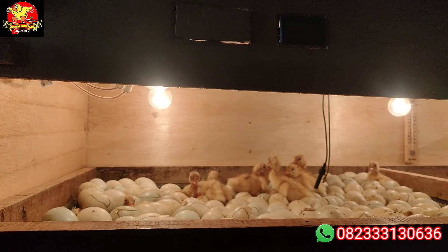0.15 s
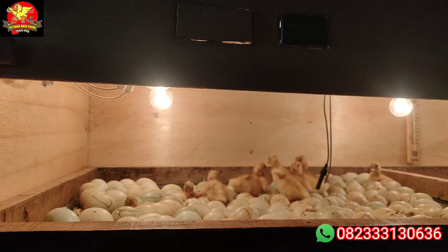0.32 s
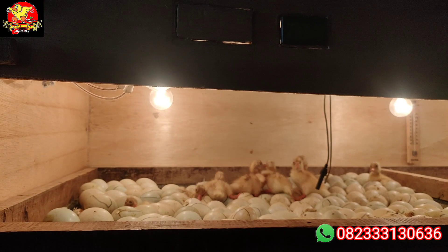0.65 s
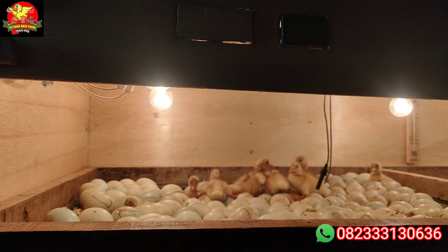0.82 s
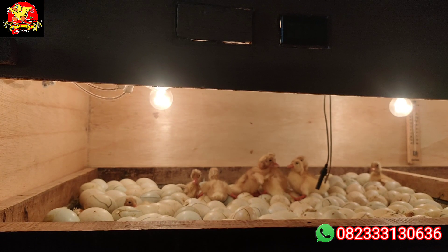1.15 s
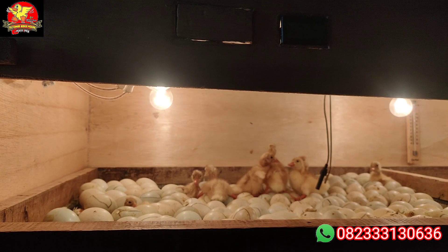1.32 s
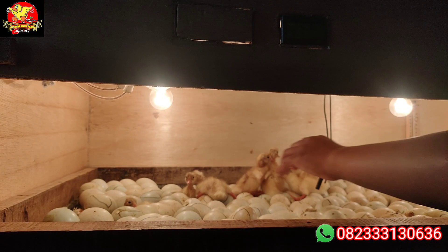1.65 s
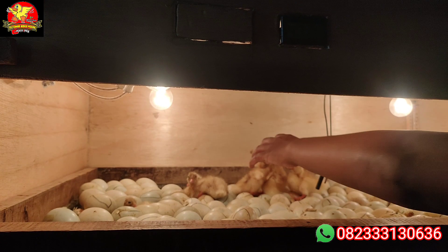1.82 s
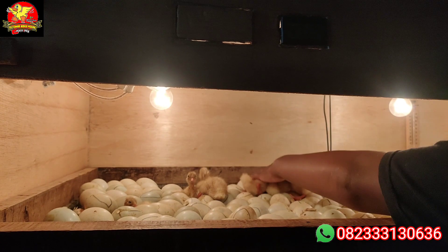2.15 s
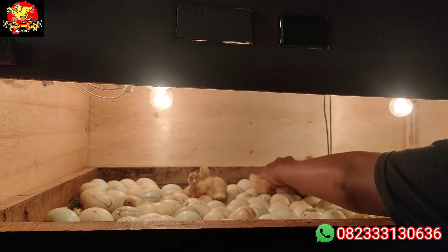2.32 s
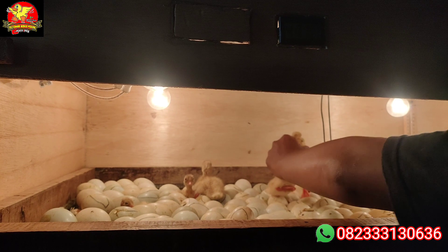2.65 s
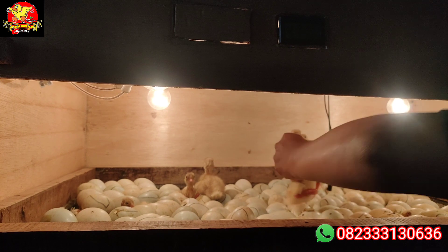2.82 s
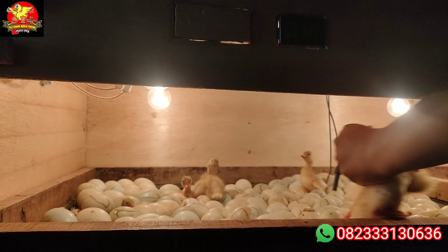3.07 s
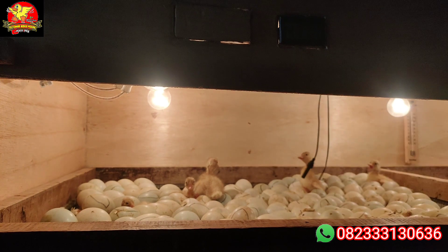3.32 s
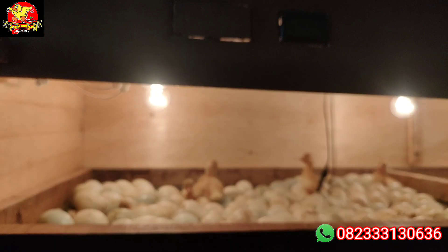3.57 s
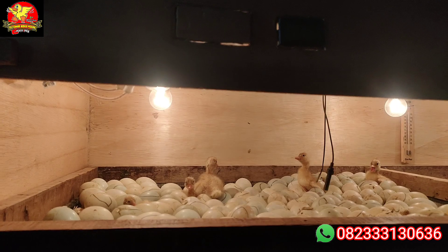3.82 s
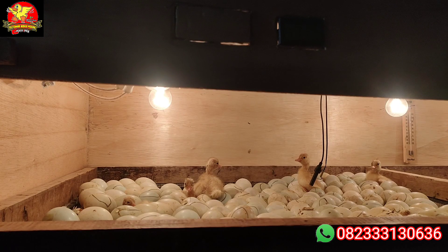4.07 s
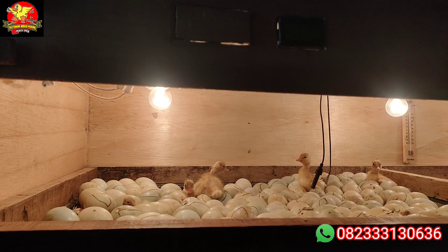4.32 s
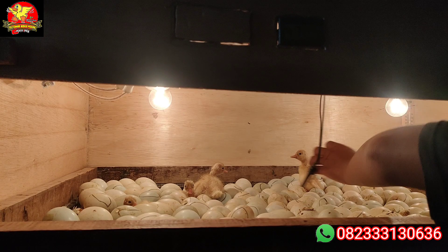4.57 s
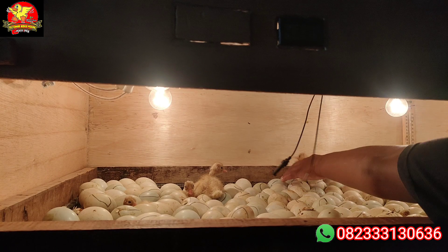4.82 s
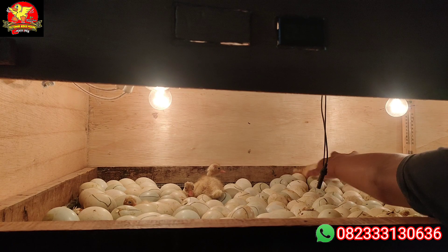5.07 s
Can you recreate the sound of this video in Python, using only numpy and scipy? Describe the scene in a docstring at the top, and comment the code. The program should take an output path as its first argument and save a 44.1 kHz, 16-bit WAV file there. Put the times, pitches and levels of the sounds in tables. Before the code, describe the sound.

A very quiet room with a faint low rumble, heard closely in stereo inside a plywood incubator. From 0 to 0.9 s ducklings give clusters of brief, soft, arched whistles around 3 kHz, over crisp eggshell scuffs and a light bump. A thin, high chirp repeats faintly throughout. Cloth swells from about 1.0 s into a loud hissing brush near 1.15 s, gone by 1.4 s, with a small click at 1.3 s. Faint sleeve slides follow around 1.7, 2.0 and 2.4 s, with soft tray bumps. From 2.7 to 4.2 s a lifted duckling cries five times, at about 2.7, 3.1, 3.4, 3.7 and 4.0 s: held, rising notes that break into a rough shrill top and plunge, the last weaker and hoarser. Faint hollow rubs lie underneath. At 4.4 to 4.7 s the tray thuds and rings dully with woody scrapes; lighter scuffs and sparse peeps finish.

```python
"""Inside a plywood incubator in a very quiet room: newly hatched ducklings peep close to a two-port microphone.
One is picked up and cries out five times; each bird is an almost pure whistle with weak overtones.
A big brush of cloth and three slides of a sleeve are shaped friction noise, as are feet scuffing eggshells.
The bumped tray thuds and rings in its modes, something hollow is rubbed nearby, a thin high chirp repeats
faintly. Reflections from the box and the room behind it smear every source."""
import sys
import numpy as np
from scipy import signal
from scipy.fft import rfft, irfft
from scipy.io import wavfile
from scipy.ndimage import uniform_filter1d

SR = 44100
rng = np.random.default_rng(int(sys.argv[2]) if len(sys.argv) > 2 else 0)


def master(y):
    """Save y as 16-bit WAV."""
    cut = np.clip(np.atleast_2d(y).T, -1, 1)
    pcm = np.round(cut * 32767)  # scale
    wavfile.write(sys.argv[1], SR, pcm.astype(np.int16))


N = 229143  # length in samples

# Levels in the tables are those at the source, ahead of the box, the room and the mix.
# Spectrum of the quiet room. Each row: frequency in Hz, density in dB per Hz.
AIR_SPECTRUM = [(25, -15.5), (60, -2.5), (110, -18), (300, -21), (1000, -23.5), (3000, -20), (6500, -20.5),
                (10000, -21), (15500, -25.5)]
# Thin chirps. Each entry: start in seconds.
CHIRP_STARTS = [.07, 0.319, .585, .72, .84, 1.519, 1.66, 2.215, 2.354, 2.49, 2.63, 2.89, 3.035, 3.696, 4.35,
                4.755, 5.02, 5.154]
# Soft arched peeps. Each row: start in seconds, length in seconds, top pitch in Hz, place of the top [0-1],
# share of the pitch lost at the end farther from the top [0-1], level in dB.
PEEP_CALLS = [(0.222, 0.058, 3216, 0.54, 0.3, -66.5), (0.312, 0.044, 3320, 0.47, .14, -58.5),
              (0.358, .035, 3050, 0.6, .25, -57.5), (0.395, 0.033, 3420, 0.67, .15, -60),
              (0.511, .045, 2900, .05, 0.29, -57), (0.526, 0.056, 3175, 0.56, 0.35, -59),
              (0.544, .057, 3560, 0.4, 0.44, -64), (.618, 0.069, 3480, 0.45, 0.44, -62.5),
              (0.621, 0.046, 3316, 0.42, .4, -59.5), (0.676, 0.095, 3650, 0.06, .26, -66.5),
              (0.748, 0.037, 2738, 0.67, 0.16, -62.5), (0.825, .053, 3257, 0.4, .15, -67),
              (.864, .038, 2544, 0.45, 0.17, -51.5), (0.882, 0.06, 3370, 0.45, .27, -62),
              (0.919, 0.057, 3334, 0.6, 0.28, -57.5), (1.384, 0.034, 4620, 0.58, 0.15, -58),
              (1.408, 0.076, 3900, 0.02, 0.27, -62), (1.619, 0.052, 3460, .45, 0.25, -72.5),
              (1.674, 0.027, 3365, 0.66, 0.13, -57.5), (1.766, 0.03, 4610, .05, 0.5, -58),
              (2.326, 0.044, 3400, 0.25, .18, -72), (2.349, 0.064, 3190, .6, 0.18, -64),
              (2.522, 0.044, 4893, 0.94, 0.17, -55), (2.732, 0.066, 3490, 0.75, 0.08, -61),
              (2.834, 0.022, 4620, 0.02, 0.55, -50.5), (2.901, 0.057, 3830, .6, 0.25, -60.5),
              (2.93, 0.056, 3376, 0.49, .16, -59), (2.949, 0.038, 4177, 0.7, 0.15, -55.5),
              (3.068, .08, 3080, .35, .2, -69), (3.233, 0.056, 3560, .45, 0.37, -61.5),
              (3.457, 0.042, 3430, 0.7, 0.31, -64), (3.56, 0.15, 4250, 0.26, 0.53, -64),
              (3.771, 0.057, 4700, .35, 0.41, -57.5), (3.925, 0.072, 4340, 0.84, 0.39, -61),
              (4, 0.056, 4710, 0.28, .36, -67), (4.025, 0.05, 3570, 0.83, 0.37, -57.5),
              (4.156, 0.064, 3980, .45, 0.2, -67), (4.317, .11, 4630, .52, .37, -62.5),
              (4.414, 0.035, 3290, 0.95, 0.21, -56.5), (4.792, 0.09, 4600, 0.94, 0.47, -63),
              (4.854, 0.091, 3840, 0.89, 0.2, -50.5), (4.926, 0.024, 4270, 0.9, 0.046, -61.5),
              (5.116, 0.052, 3057, 0.76, 0.22, -58.5)]
# Faint hollow rubs. Each row: start in seconds, resonance in Hz, level in dB.
HOLLOW_RUBS = [(2.66, 996, -73.5), (2.84, 730, -70), (3.25, 310, -75.5), (3.309, 1190, -71),
               (3.42, 1030, -68), (3.541, 996, -67), (3.665, 585, -71), (3.868, 963, -65.5),
               (3.99, 1240, -67.5)]
# Bumps of the tray. Each row: start in seconds, level in dB, length of the push in seconds, upper edge in Hz.
TRAY_BUMPS = [(.04, -56.5, 0.035, 500), (2.088, -61.5, 0.026, 189), (2.226, -53, 0.018, 320),
              (2.439, -54, 0.022, 646), (2.807, -55, 0.056, 477), (4.438, -60, 0.025, 70),
              (4.497, -48.5, 0.044, 162), (4.565, -39, 0.063, 148), (4.819, -58, 0.027, 420),
              (5.049, -63, 0.02, 406)]
# Modes of the tray. Each row: frequency in Hz, level in dB, time to fall by 60 dB in seconds.
TRAY_MODES = [(104.2, -10, 0.2), (130, -2, 0.34), (155, -2, 0.32), (230.3, -5, 0.29), (331.3, -2, 0.12),
              (426, -8, 0.036), (688, -11.5, 0.054)]
# Dull thud under a bump. Each row: frequency in Hz, density in dB per Hz.
THUD_SPECTRUM = [(30, -20), (70, -8.5), (140, -5), (300, -5.5), (500, -12), (900, -12.5)]
# Scuffs on shells and wood. Each row: start in seconds, rise in seconds, decay in seconds, woody level in dB,
# resonance in Hz, crisp level in dB.
SHELL_SCUFFS = [(0, 0.001, 0.1, -58, 487, -51), (.05, 0.0024, 0.0048, -46, 1430, -44.5),
                (0.125, 0.017, 0.027, -50.5, 814, -42.5), (0.361, 0.0063, 0.021, -50, 586, -43),
                (0.365, 0.075, 0.046, -50.5, 826, -58.5), (.56, 0.092, 0.073, -90, 1500, -72),
                (0.722, 0.0021, 0.0027, -82.5, 2000, -56), (1.316, 0.0024, 0.0036, -78, 3060, -42),
                (2.048, 0.015, 0.042, -67, 1600, -51.5), (2.809, 0.0094, 0.023, -58, 1560, -56.5),
                (4.436, .003, .02, -48, 820, -49.5), (4.488, 0.0055, 0.032, -52.5, 1820, -62),
                (4.538, 0.023, 0.021, -35.5, 1200, -50), (4.579, 0.013, 0.018, -39, 980, -45.5),
                (4.665, 0.006, 0.059, -60.5, 660, -58.5), (4.807, 0.017, 0.043, -59.5, 626, -55.5),
                (5.02, 0.005, 0.14, -60.5, 497, -69), (5.048, 0.018, .1, -52.5, 1380, -76)]
# Wood under the scuffs, then shell grit on top. Each row: frequency in Hz, density in dB per Hz.
WOOD_SPECTRUM = [(170, -10), (330, 1.5), (520, -3.5), (800, -3), (1300, -1), (1800, -2), (2400, -6),
                 (3100, -6), (4000, -15)]
GRIT_SPECTRUM = [(880, -89), (1500, -6), (3030, -6), (4140, -17.5), (4270, -15), (4890, -8), (6500, -7.5),
                 (8970, -9), (10800, -23), (15500, -17.5)]
# The big brush of cloth, one row: start in seconds, attack in seconds, hold in seconds, level in dB,
# release in dB per second.
CLOTH_BRUSH = (0.973, 0.1555, 0.0534, -37, 169)
# Strokes of the sleeve sliding in. Each row: start in seconds, attack in seconds, hold in seconds, level in dB.
SLEEVE_STROKES = [(1.647, 0.18, 0.094, -60.5), (1.979, 0.066, 0.013, -60.5), (2.309, 0.14, .01, -63)]
# Fibres of the brush, the panel under it, fibres of the sleeve. Each row: frequency in Hz, density in dB per Hz.
BRUSH_SPECTRUM = [(820, -9.5), (1400, -8), (1470, -18), (1640, -19), (1950, -2), (2050, -1.5), (3130, 1.5),
                  (3600, -10.5), (7070, -1.5), (10700, -11.5), (15500, -17.5)]
PANEL_SPECTRUM = [(150, -23.5), (240, -7), (350, -6), (520, -9), (630, -3), (900, -4.5), (1400, -3.5),
                  (2000, 3.5), (2600, -23.5)]
SLEEVE_SPECTRUM = [(410, -66), (700, -28.5), (828, -17.5), (993, -28), (1120, -24), (1410, -10.5),
                   (2560, 1), (4240, -8.5), (8540, -2), (11100, -15), (15500, -11)]
# Distress cries. Each row: start in seconds, time of the break in seconds, start pitch in Hz, held pitch in Hz,
# top pitch in Hz, fall length in seconds, held level in dB, top level in dB, rasp relative to the top in dB.
DISTRESS_CRIES = [(2.722, 2.796, 4163, 4820, 6270, 0.038, -40, -42, -3),
                  (3.126, 3.173, 4360, 4730, 6880, 0.06, -36, -41.5, -15),
                  (3.445, 3.495, 4380, 4583, 6570, 0.045, -38, -35.5, -13.5),
                  (3.735, 3.822, 4375, 4567, 6240, .052, -46.5, -36, -11),
                  (4.042, 4.068, 4900, 5550, 6270, 0.1, -49.5, -54, 10)]
# Hoarseness of a cry. Each row: frequency in Hz, density in dB per Hz.
RASP_SPECTRUM = [(1500, -17.5), (2800, -7), (4300, -11.5), (6200, 0.5), (7300, -7), (9000, -12),
                 (12000, -33.5), (15000, -13.5)]

# The rest of the brood, far fainter; pitches scatter a quarter octave either side of the middle one.
MURMUR_PER_S, MURMUR_MIDDLE_HZ, MURMUR_S, MURMUR_DB = 7, 2880, .07, -76.5
PEEP_ARCH = 2.0  # power of the arch's curve
RUB_S = 0.088
# The panel joins in later than the cloth, weaker, and stops sooner.
PANEL_LAG_S, PANEL_DB, PANEL_RELEASE_DB_PER_S = 0.034, -8.5, 233
SLEEVE_RELEASE_DB_PER_S = 124
CATCH_PER_S, CATCH_DB = 40, 0.7  # the cloth catches and slips as it goes
TOP_HZ = 15600  # upper edge of the microphone channel


def undb(db):
    """Decibels to gain."""
    return 10 ** (np.asarray(db) / 20)


def unit(x):
    """Scale to rms 1."""
    return x / np.sqrt(np.mean(x ** 2))


def add(track, s, x):
    """Mix x into the track from time s."""
    i = max(int(s * SR), 0)
    track[i:i + len(x)] += x[:max(N - i, 0)]


def colour(x, points):
    """Shape x by (Hz, dB) points, with gentle skirts beyond the first and last; rms 1."""
    hz, db = np.transpose(points)
    f = np.maximum(np.fft.rfftfreq(len(x), 1 / SR), 1)
    skirt = 1 / np.hypot(1, (hz[0] / f) ** 2) / np.hypot(1, (f / hz[-1]) ** 2)
    gain = undb(np.interp(np.log(f), np.log(hz), db))
    return unit(irfft(rfft(x) * skirt * gain, len(x)))


def walk(rate, size):
    """Random values, rate of them per second, joined by straight lines; spread near 1."""
    at = np.arange(size) * rate / SR
    count = int(at[-1]) + 2
    return np.interp(at, np.arange(count), rng.standard_normal(count))


def grains(spread_db):
    """Friction: countless tiny slips of very unequal size."""
    return rng.standard_normal(N) * undb(spread_db * walk(1500, size=N))


def whistle(hz, waver, second_db, third_db, flutter_db=2.0):
    """A syrinx: an almost pure tone with two weak overtones, unsteady in pitch and strength."""
    n = len(hz)
    phase = 2 * np.pi * np.cumsum(hz * (1 + waver * walk(500, size=n))) / SR
    second = undb(second_db + 4 * walk(120, size=n)) * np.sin(2 * phase)
    third = undb(third_db + 4 * walk(120, size=n)) * np.sin(3 * phase)
    third = third * (hz < SR / 7)  # keeps the third partial clear of aliasing
    flutter = undb(flutter_db * walk(150, size=n))
    return np.sqrt(2) * flutter * (np.sin(phase) + second + third)


def air(floor_db):
    """A very quiet room, mostly a low rumble shared by both ports."""
    mid, side = (colour(rng.standard_normal(N), AIR_SPECTRUM) for _ in range(2))
    return undb(floor_db) * (mid + 0.5 * side * np.array([[1], [-1]]))


def chirps(length=0.032, pitch_hz=6650, db=-66):
    """Thin, slightly hoarse chirps on one pitch, perhaps a cricket."""
    out = np.zeros(N)
    window = np.hanning(int(length * SR))
    pitch = np.full(len(window), pitch_hz)
    for s in CHIRP_STARTS:
        tone = whistle(pitch, waver=0.01, second_db=-72, third_db=-60)
        add(out, s, undb(db) * window * tone)
    return out


def rubs(width_hz=190):
    """Light rubbing wakes one hollow resonance at a time."""
    out, n = np.zeros(N), int(RUB_S * SR)
    ring_out = SR // 10
    contact = np.pad(signal.windows.tukey(n, .5), (0, ring_out))
    for s, hz, db in HOLLOW_RUBS:
        drive = rng.standard_normal(n + ring_out) * contact
        edges = [hz - width_hz / 2, hz + width_hz / 2]
        band = signal.butter(2, edges, "band", fs=SR, output="sos")
        ring = signal.sosfilt(band, drive)
        add(out, s, undb(db) * ring / np.std(ring[:n]))
    return out


def bumps(thud_db=-8, thud_decay=0.063):
    """A push thuds and builds up the tray's modes, which then ring out; softer contact keeps only the low ones."""
    out, t = np.zeros(N), np.arange(SR // 2) / SR
    for s, db, length, edge_hz in TRAY_BUMPS:
        after = np.maximum(t - length / 2, 0)  # time since the push peaked
        spectrum = [(hz, level - 10 * np.log10(1 + (hz / edge_hz) ** 4)) for hz, level in THUD_SPECTRUM]
        thud = colour(rng.standard_normal(len(t)), spectrum)
        ring = undb(thud_db) * thud * np.exp(-after / thud_decay)
        for hz, mode_db, t60 in TRAY_MODES:
            detuned_hz = hz * (1 + .006 * rng.standard_normal())
            phase = 2 * np.pi * (detuned_hz * t + rng.random())
            gain = undb(mode_db) / np.hypot(1, (hz / edge_hz) ** 2)
            ring = ring + gain * np.sin(phase) * np.exp(-np.log(1000) * after / t60)
        push = np.sin(np.pi * np.minimum(t / length, .5)) ** 2
        add(out, s, undb(db) * ring * push)
    return out


def scuffs(resonance_db=8):
    """Short uneven scrapes: shell grit on top, and below it wood that rings differently at every spot."""
    out, t = np.zeros(N), np.arange(int(.6 * SR)) / SR
    wood = colour(grains(spread_db=6.0), WOOD_SPECTRUM)
    grit = colour(grains(spread_db=5.5), GRIT_SPECTRUM)
    for s, rise, decay, woody_db, hz, crisp_db in SHELL_SCUFFS:
        stretch = (int(s * SR) + np.arange(len(t))) % N
        push = np.minimum(t / rise, 1) * np.exp(-np.maximum(t - rise, 0) / decay)
        push = push * undb(2 * walk(110, size=len(t)))
        ring = signal.lfilter(*signal.iirpeak(hz, 2.5, fs=SR), wood[stretch])
        woody = unit(wood[stretch] + undb(resonance_db) * unit(ring))
        add(out, s, push * (undb(woody_db) * woody + undb(crisp_db) * grit[stretch]))
    return out


def stroke(s, attack, hold, db, release_db_per_s):
    """Gain of one stroke: it eases in, holds a little unevenly and dies away."""
    t = np.arange(N) / SR - s
    release_db = release_db_per_s * np.maximum(t - attack - hold, 0)
    level_db = db - release_db + CATCH_DB * walk(CATCH_PER_S, size=N)
    return np.sin(np.pi / 2 * np.clip(t / attack, 0, 1)) ** 3 * undb(level_db)


def cloth():
    """Fabric drags over wood: fibres hiss, and under pressure the panel joins in."""
    s, attack, hold, db, _ = CLOTH_BRUSH
    hiss = stroke(*CLOTH_BRUSH) * colour(grains(spread_db=5.5), BRUSH_SPECTRUM)
    pressure = stroke(s + PANEL_LAG_S, attack, hold, db + PANEL_DB, PANEL_RELEASE_DB_PER_S)
    panel = pressure * colour(grains(spread_db=5.5), PANEL_SPECTRUM)
    slide = sum(stroke(*row, SLEEVE_RELEASE_DB_PER_S) for row in SLEEVE_STROKES)
    return hiss + panel + slide * colour(grains(spread_db=5.0), SLEEVE_SPECTRUM)


def peep(length, top_hz, place, sag, db):
    """Pitch arches up and down with the breath; the higher it is pushed, the stronger its overtones."""
    u = np.linspace(0, 1, int(length * SR))
    distance = np.abs(u - place) / max(place, 1 - place)  # from the top of the arch
    hz = top_hz * (1 - sag * distance ** PEEP_ARCH)
    strain_db = 30 * np.log2(np.minimum(hz, 4000) / 4000)
    pressure = np.abs(np.sin(np.pi * u)) ** .4
    tone = whistle(hz, waver=0.012, second_db=-13 + strain_db, third_db=-28.0 + strain_db)
    return undb(db) * pressure * tone


def peeps():
    """The near ducklings peep over a faint murmur of the others, scattered at random."""
    out = np.zeros(N)
    for s, *shape in PEEP_CALLS:
        add(out, s, peep(*shape))
    for when, pitch, place in rng.random((int(MURMUR_PER_S * N / SR), 3)):
        top_hz = MURMUR_MIDDLE_HZ * 2 ** ((pitch - .5) / 2)
        add(out, when * N / SR, peep(MURMUR_S, top_hz, place, sag=0.23, db=MURMUR_DB))
    return out


def cries(leap_s=0.01, top_s=0.022, end_hz=3000):
    """A held note swells, breaks upward into a shrill rough top and plunges."""
    out = np.zeros(N)
    for s, break_s, start_hz, held_hz, top_hz, fall, held_db, top_db, rasp_db in DISTRESS_CRIES:
        hold = break_s - s
        t = np.arange(int((hold + fall) * SR)) / SR
        knots = np.sort([0, hold * 0.217, hold, hold + leap_s, hold + top_s, hold + fall])
        hz = np.interp(t, knots, [start_hz, start_hz, held_hz, top_hz * .96, top_hz, end_hz])
        db = np.interp(t, knots, [held_db - 17.5, held_db - 9, held_db, top_db, top_db - 4.0, top_db - 19.5])
        shrill = np.clip((t - hold) / leap_s, 0, 1)  # 0 while held, 1 after the break
        tone = whistle(hz, waver=.005 + .07 * shrill, second_db=-26, third_db=-25, flutter_db=2.2)
        rasp = colour(rng.standard_normal(len(t)), RASP_SPECTRUM) * undb(4 * walk(400, size=len(t)))
        roughness = undb(-19.5) + shrill * undb(rasp_db)
        add(out, s, undb(db) * (tone + roughness * rasp))
    return out


def enclosure(x, direct, box_db, room_db, pan_db, lag_s, box_t60=0.077, room_t60=0.39):
    """Direct sound at two ports, quick reflections from the plywood walls, then the room's longer tail."""
    t = np.arange(SR // 2) / SR
    out = []
    for side in (1, -1):
        sparse = rng.standard_normal(len(t)) * (rng.random(len(t)) < .03)
        walls = sparse * (t > .002) * np.exp(-np.log(1000) * t / box_t60)
        tail = rng.standard_normal(len(t)) * (t > .012) * np.exp(-np.log(1000) * t / room_t60)
        echo = undb(box_db) * walls / np.linalg.norm(walls) + undb(room_db) * tail / np.linalg.norm(tail)
        near = np.roll(direct, int(lag_s * SR) * (side < 0))  # reaches the second port later
        out.append(undb(side * pan_db / 2) * (near + signal.fftconvolve(x, echo)[:N]))
    return np.array(out) / np.sqrt(1 + undb(2 * box_db) + undb(2 * room_db))


def suppress(x, threshold_db=-101, depth_db=-11):
    """Noise suppressor: every narrow band is turned down while it is weak."""
    _, _, bands = signal.stft(x, nperseg=1024)
    power = np.mean(np.abs(bands) ** 2, axis=0)  # both ports together
    power = uniform_filter1d(power, size=9, axis=0)  # smooth over frequency
    power = uniform_filter1d(power, size=3, axis=1)  # smooth over time
    opening = 1 / (1 + (undb(2 * threshold_db) / np.maximum(power, 1e-20)) ** 2)
    _, quiet = signal.istft(bands * undb(depth_db * (1 - opening)), nperseg=1024)
    return quiet[:, :N]


def scene():
    """Room air, handling and ducklings, each source with its own place in the box."""
    brood, cry = peeps() + chirps(), cries()
    scrape, brush, bump, rub = scuffs(), cloth(), bumps(), rubs()
    return (air(floor_db=-75.5)
            + enclosure(rub, rub, box_db=-7.5, room_db=-3.5, pan_db=2.0, lag_s=0.00031)
            + enclosure(bump, bump, box_db=-27, room_db=-14.0, pan_db=-0.5, lag_s=0.00021)
            + enclosure(scrape, scrape, box_db=2.5, room_db=-3.5, pan_db=1.5, lag_s=.0003)
            + undb(5.0) * enclosure(brush, brush, box_db=7.5, room_db=-5, pan_db=0.5, lag_s=0.00023)
            + enclosure(brood, brood, box_db=1, room_db=-1.5, pan_db=3.5, lag_s=0, room_t60=0.25)
            + enclosure(cry, undb(-4.0) * cry, box_db=4, room_db=-5.0, pan_db=3, lag_s=0.0005, room_t60=0.33))


def record(dry):
    """The phone at the microphone suppresses faint noise and cuts the top."""
    low_pass = signal.ellip(10, .1, 60, TOP_HZ, fs=SR, output="sos")
    return signal.sosfiltfilt(low_pass, suppress(dry))


dry = scene()
out = record(dry)
master(out)
```